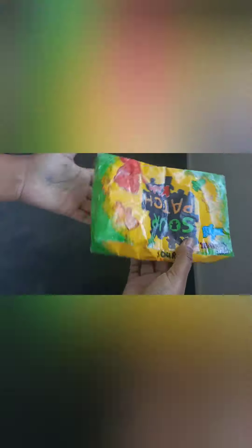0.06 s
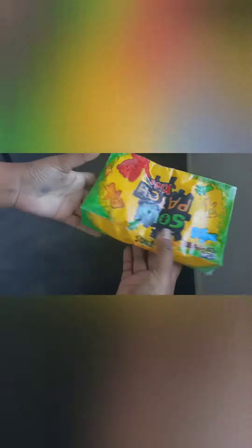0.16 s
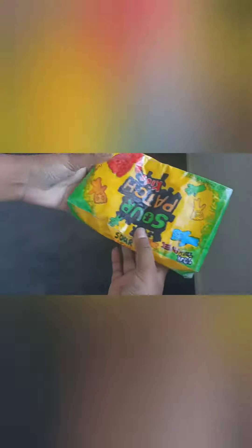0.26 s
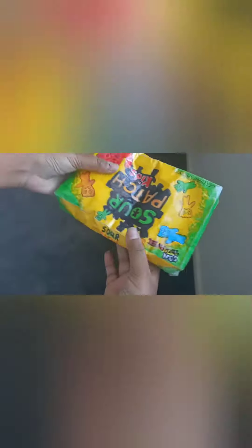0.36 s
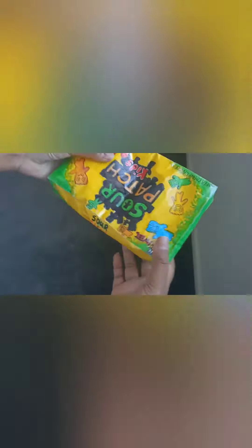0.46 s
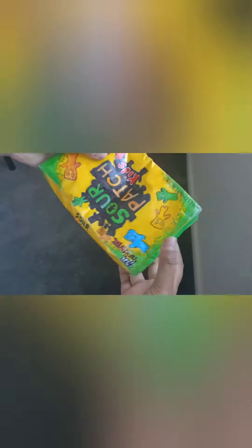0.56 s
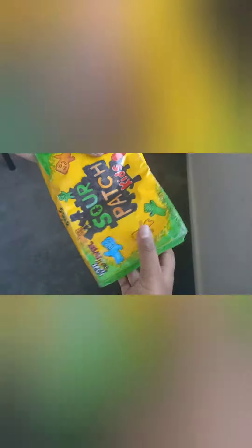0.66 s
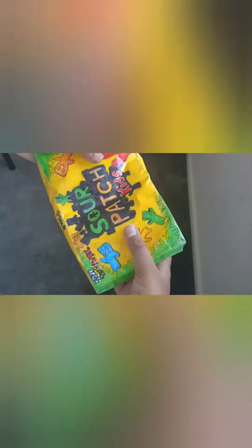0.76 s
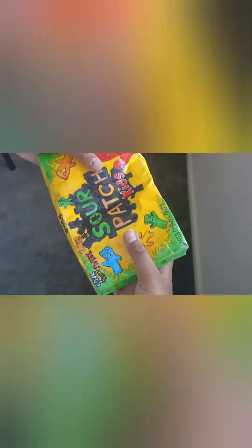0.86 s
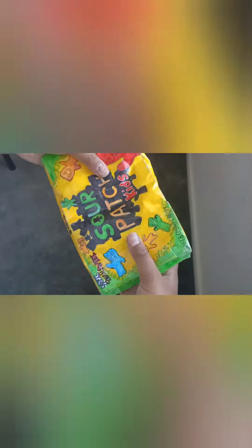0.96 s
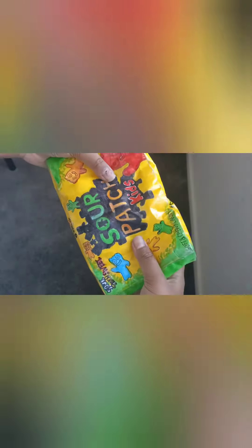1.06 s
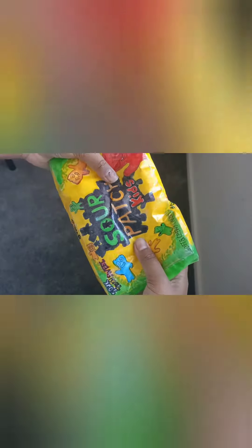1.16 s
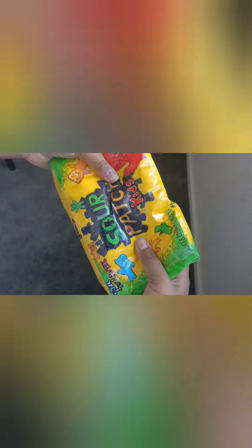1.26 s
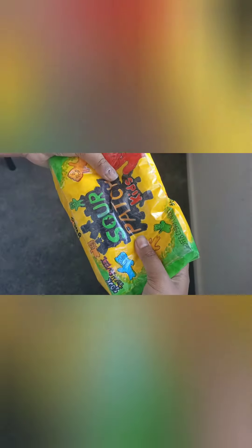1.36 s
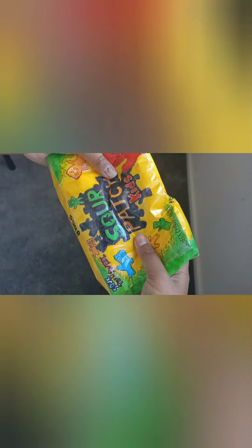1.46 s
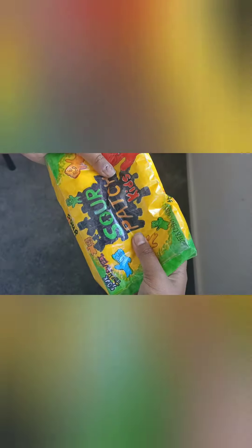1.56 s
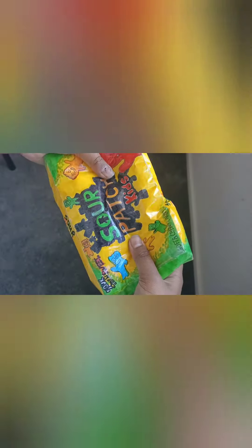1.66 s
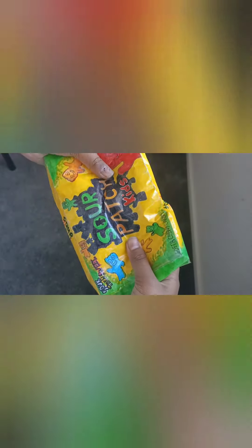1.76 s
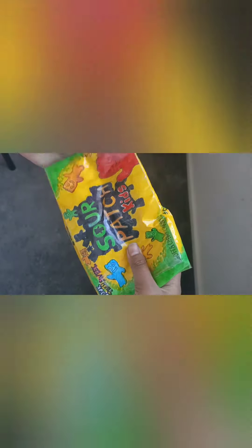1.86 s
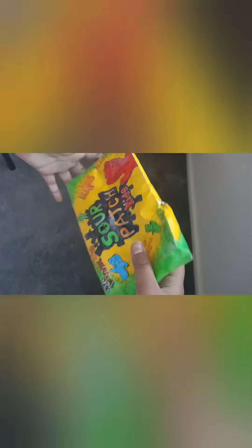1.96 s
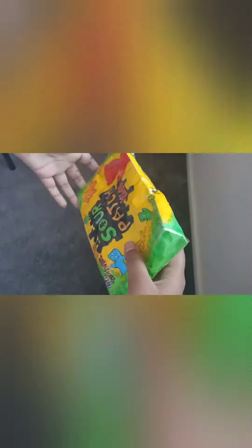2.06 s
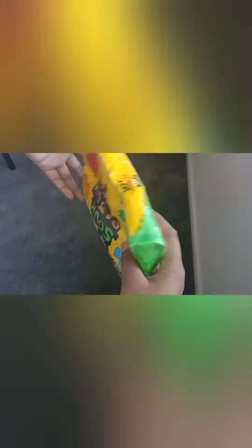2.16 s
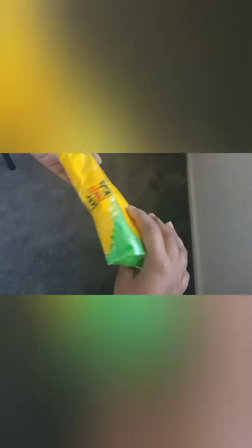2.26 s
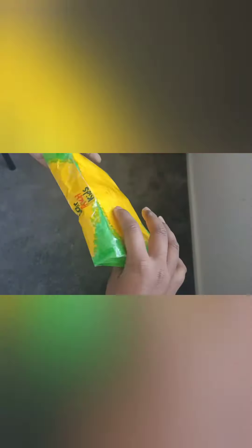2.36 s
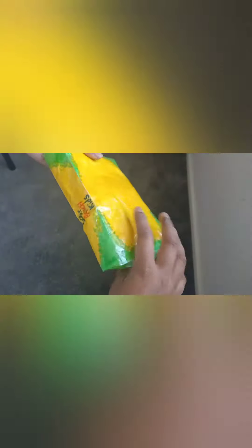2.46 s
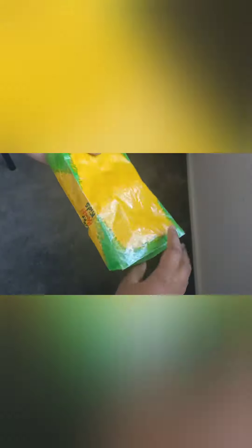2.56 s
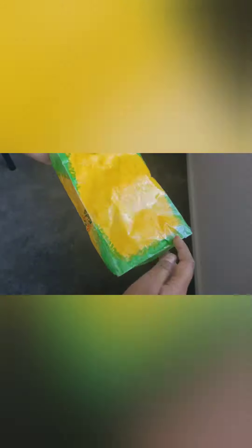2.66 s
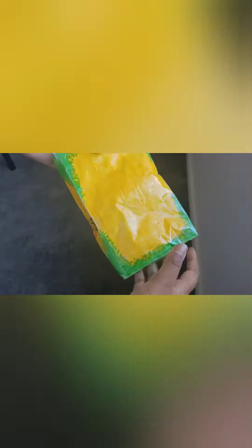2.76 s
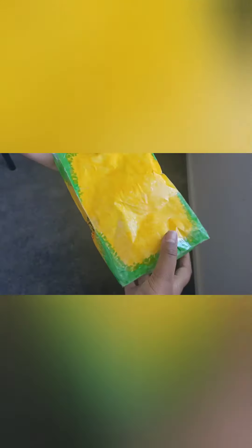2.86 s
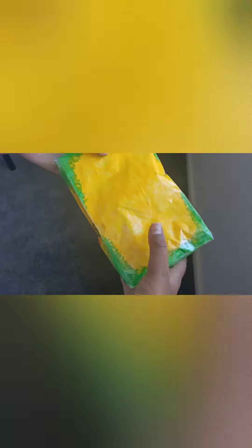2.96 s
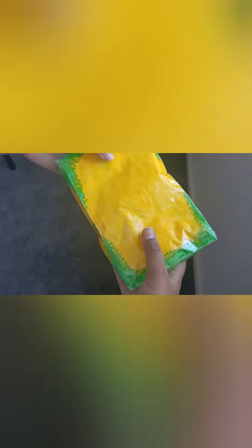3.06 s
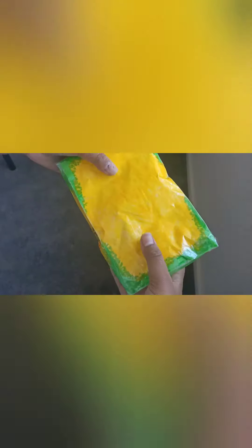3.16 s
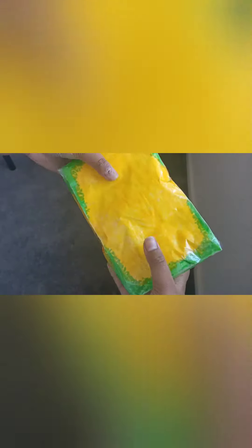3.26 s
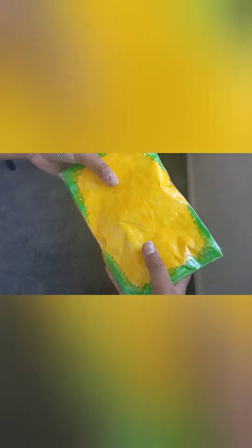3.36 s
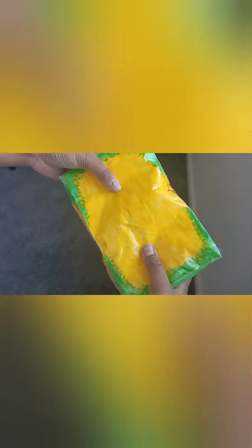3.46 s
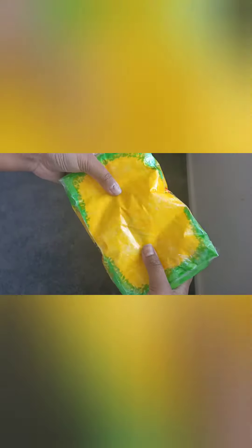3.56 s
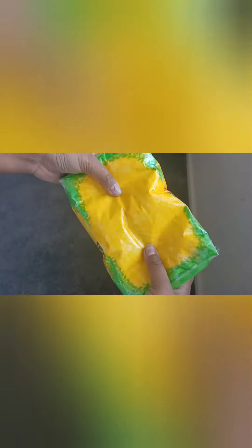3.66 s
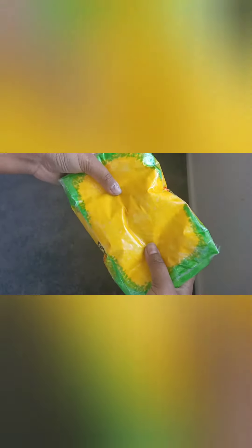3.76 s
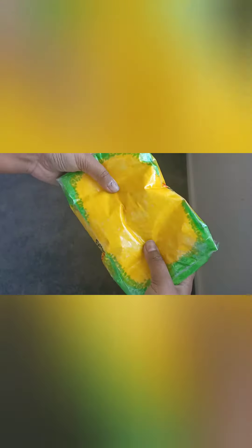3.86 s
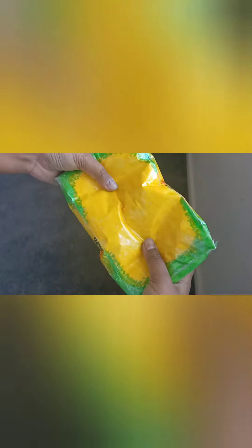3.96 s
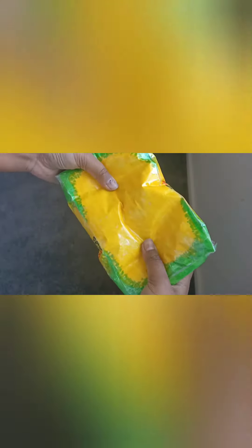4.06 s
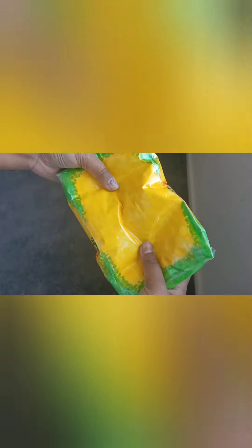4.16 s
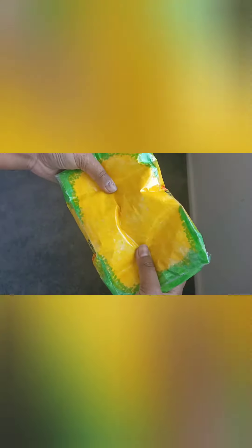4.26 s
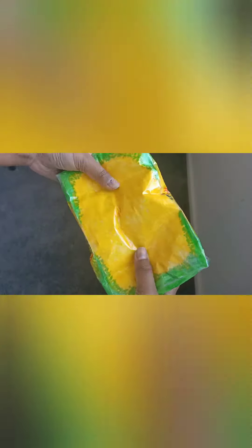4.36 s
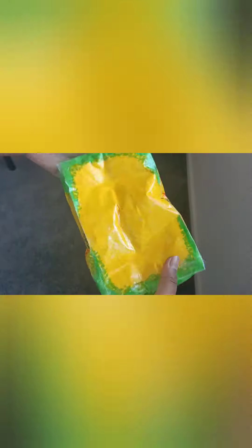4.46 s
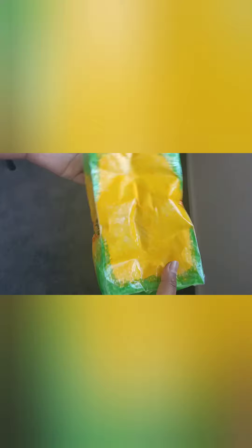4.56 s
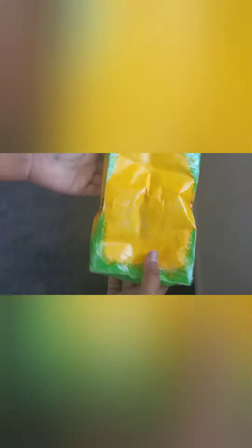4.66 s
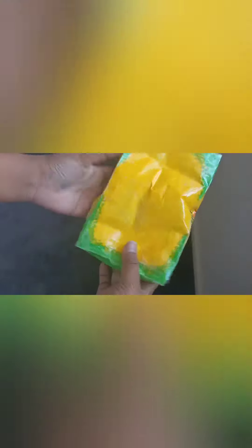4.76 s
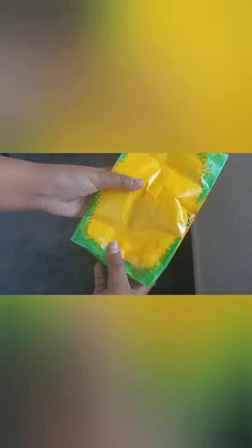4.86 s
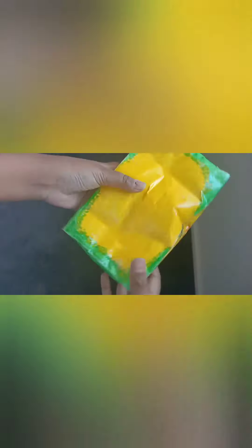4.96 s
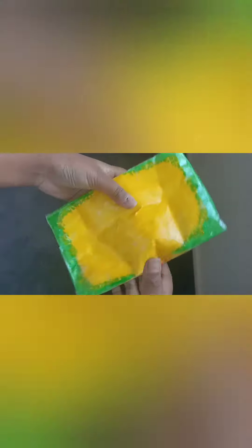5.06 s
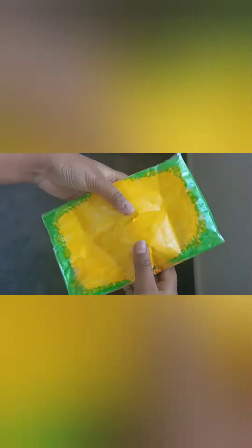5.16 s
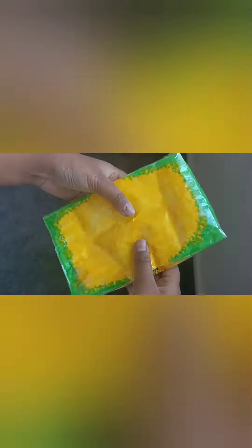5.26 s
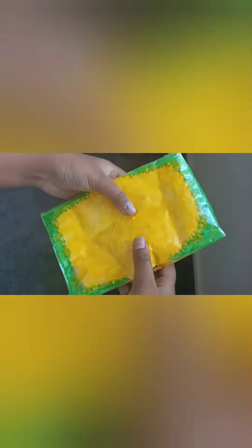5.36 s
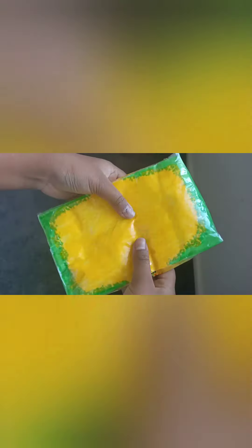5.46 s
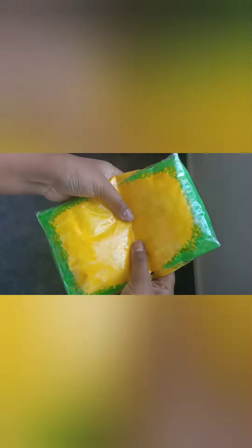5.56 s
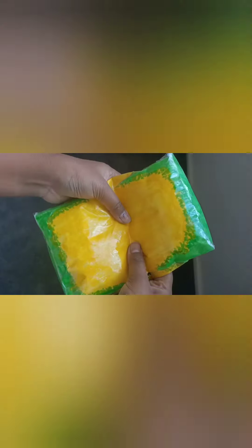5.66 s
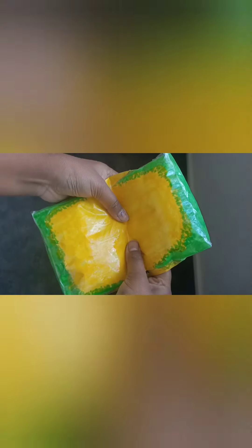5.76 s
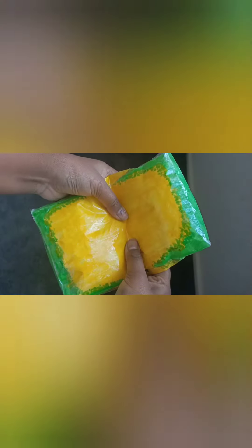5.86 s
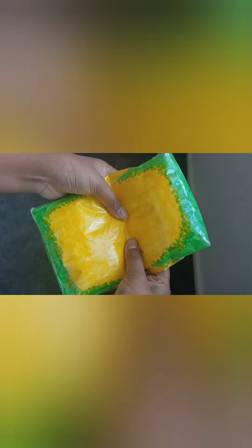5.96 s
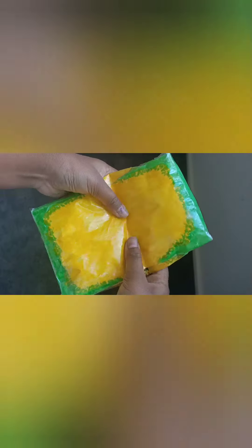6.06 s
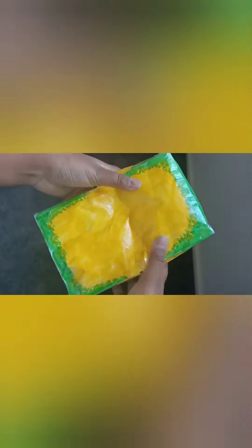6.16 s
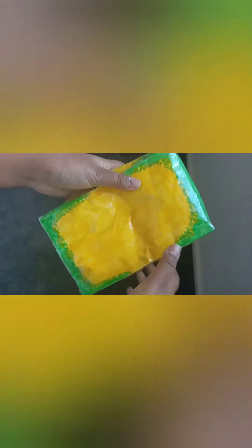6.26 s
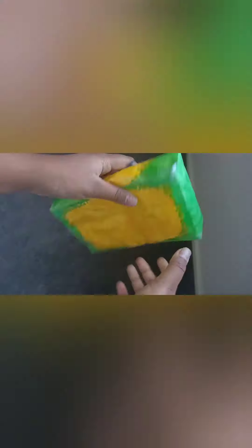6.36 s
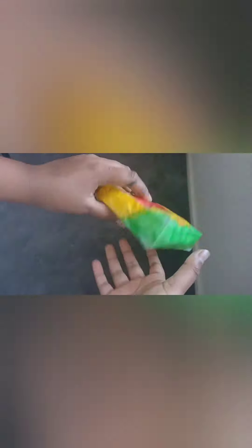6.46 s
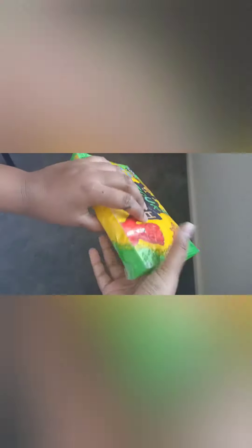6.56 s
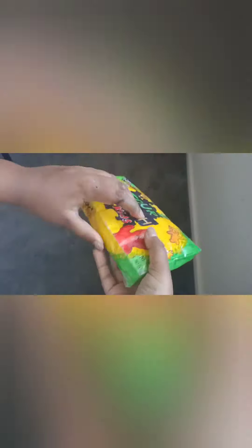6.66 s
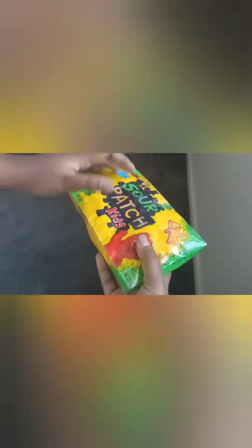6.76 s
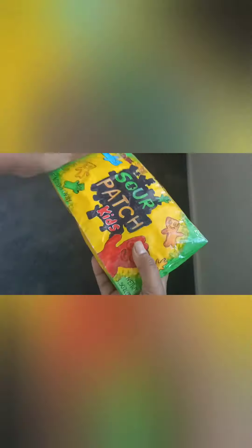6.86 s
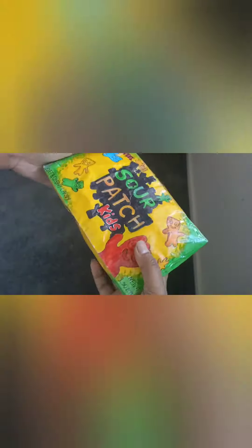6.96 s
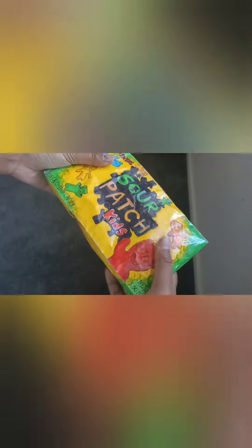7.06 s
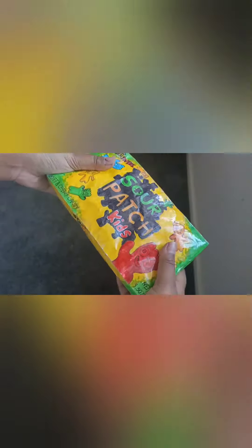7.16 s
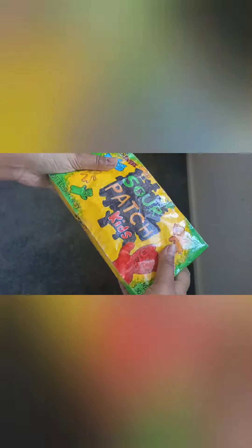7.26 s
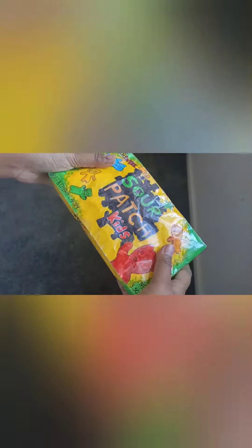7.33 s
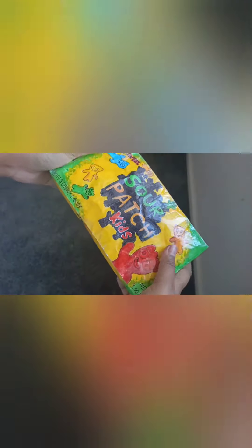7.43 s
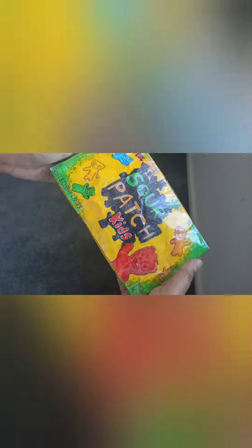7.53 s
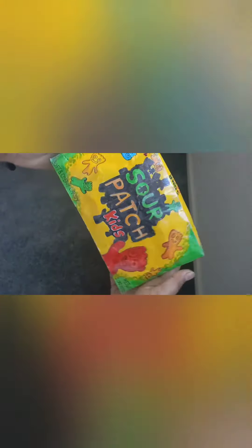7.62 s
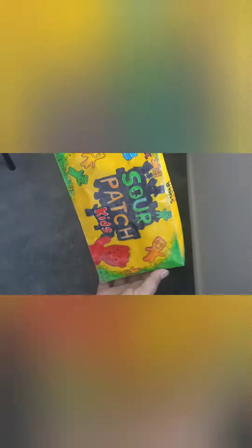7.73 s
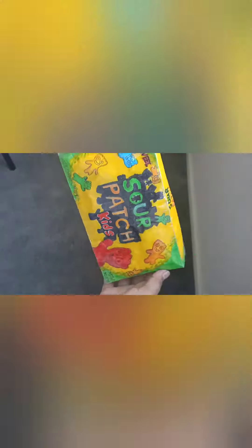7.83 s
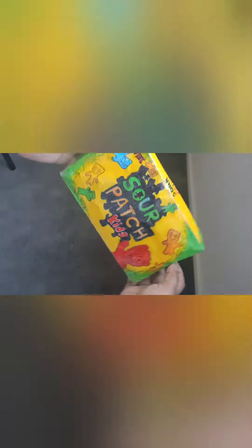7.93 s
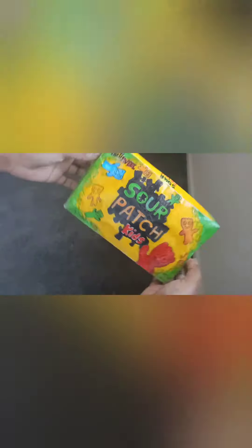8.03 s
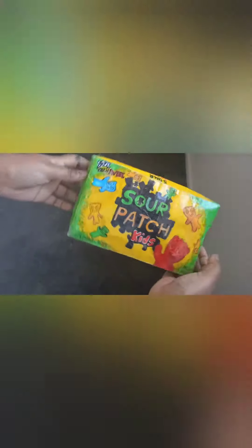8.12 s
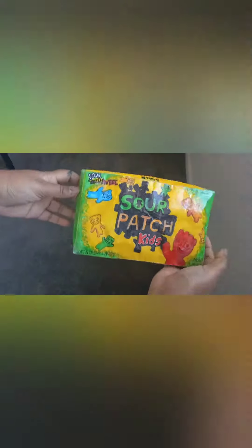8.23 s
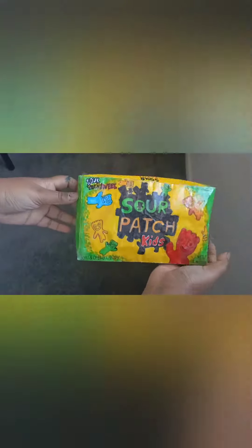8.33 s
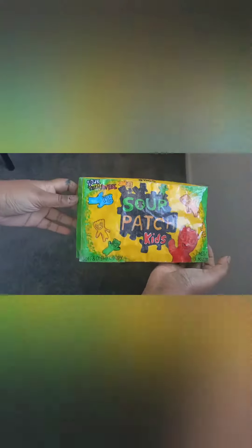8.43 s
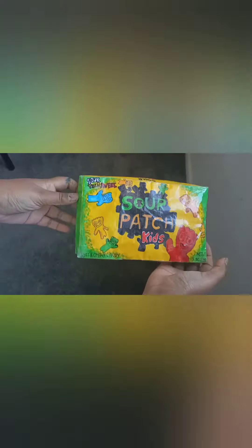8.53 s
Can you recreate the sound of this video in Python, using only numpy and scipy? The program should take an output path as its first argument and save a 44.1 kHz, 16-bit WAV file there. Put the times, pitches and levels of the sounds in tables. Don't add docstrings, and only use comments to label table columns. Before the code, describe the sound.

In a small quiet room with faint low rumble and barely audible hum, hands handle an air-filled crinkly pouch very close to a stereo phone microphone. From 0 to 0.8 seconds there are only light pats, scuffs and small crinkles. At about 1.0 a squeeze gives the loudest sharp crack, hollow thump and dense crackle, followed by smooth air hiss until 1.5. Brief snaps come near 1.85, then sparse clicks around 2.6 to 3.2. A second squeeze at 3.5 crunches less loudly, hissing until about 4.1; bright crinkles cluster at 4.3 to 4.5. From 5.25 to 5.7 a third squeeze brings rapid creases, deep thumps, a pop and a weaker, shorter hiss. A firm turn snaps at 6.15. Lighter clicks and pats follow, clustering near 7.2 and 7.5, thinning to a soft palm settling after 8.1 and a last small shift by 8.5.

```python
import sys
import numpy as np
from scipy import signal
from scipy.io import wavfile
from scipy.ndimage import uniform_filter1d

SR = 44100
rng = np.random.default_rng(int(sys.argv[2]) if len(sys.argv) > 2 else 0)


def wav_out(sig):
    wavfile.write(sys.argv[1], SR, np.round(np.clip(np.atleast_2d(sig).T, -1, 1) * 32767).astype(np.int16))


def boost_factor(decibels):
    exponent = np.asarray(decibels, float) / 20
    return 10 ** exponent


N = 378810


def evened(x):
    return x / np.sqrt(np.mean(x ** 2) + 1e-20)


def peaked(x):
    return x / abs(x).max()


def read(points, hz):
    f, value = np.transpose(points)
    return np.interp(np.log(hz + 1), np.log(f + 1), value)


def add(mix, s, sound):
    part = mix[:, round(s * SR):][:, :sound.shape[1]]
    part += sound[:, :part.shape[1]]


def causal(points):
    hz = abs(np.fft.fftfreq(4096, 1 / SR))
    log_gain = np.log(boost_factor(read(points, hz)))
    phase = -signal.hilbert(log_gain).imag
    return np.fft.ifft(np.exp(log_gain + 1j * phase)).real[:2048]


def ring(hz, cycles, size):
    turns = hz * np.arange(size) / SR
    swell_and_die = turns ** 2 * np.exp(-turns / cycles)
    fade = np.hanning(2 * size)[size:]
    return peaked(np.sin(2 * np.pi * turns) * swell_and_die * fade)


def ports(x, pan_db, lag):
    return np.array([x * boost_factor(pan_db / 2), np.roll(x, lag) * boost_factor(-pan_db / 2)])


def place(s):
    # time in seconds, lag of the right port in samples, left over right in dB.
    places = np.transpose([(.3, 7, 0), (1.05, 7, 4), (1.9, 4, 1.5), (3., 2, .5), (3.5, 1, 0),
                           (3.63, 5, -.5), (4.3, 1, .5), (5.3, 3, 1.5), (5.5, 1, 1.5), (5.65, 5, 2),
                           (7.2, 4, .5), (7.5, 1, -.5), (8.4, 7, 2.5)])
    lag = round(np.interp(s, places[0], places[1]))
    pan_db = np.interp(s, places[0], places[2])
    return lag, pan_db


def level(bursts, rise_db_per_s, rest_db):
    t = np.arange(0, N + 64, 64) / SR
    power = boost_factor(rest_db) ** 2
    for s, db, fall in bursts:
        slope_db = np.minimum(rise_db_per_s * (t - s), abs(fall) * (s - t))
        power = power + boost_factor(db + slope_db) ** 2
    return np.interp(np.arange(N) / SR, t, np.sqrt(power))


def noise(points, same, delay_s, patchy_db, size):
    frames, hz = N // (size // 4) + 5, np.fft.rfftfreq(size, 1 / SR)
    a, b, c, d, patches = rng.standard_normal((frames, len(hz), 5)).T
    patches = uniform_filter1d(patches, size=10, axis=0)
    patches = evened(uniform_filter1d(patches, size=10, axis=1))
    likeness = np.clip(read(same, hz), -1, 1)[:, None]
    left = a + 1j * b
    right = likeness * left + np.sqrt(1 - likeness ** 2) * (c + 1j * d)
    right = right * np.exp(-2j * np.pi * hz * delay_s)[:, None]
    z = np.array([left, right]) * boost_factor(read(points, hz)[:, None] + patchy_db * patches)
    z[:, hz > 15520] = 0
    return evened(signal.istft(z, nperseg=size, noverlap=3 * size // 4)[1][:, :N])


def creases():
    rows = list([(0.9748, -36.5, -18.5, 1520, -54.5), (1.0052, -34, -22, 2700, -25.5),
                 (1.0305, -16.5, -4, 1450, -36), (1.141, -33.5, -19.5, 1120, -55),
                 (1.8341, -32.5, -27.5, 1530, -30), (1.8772, -38, -26.5, 1380, -48),
                 (1.956, -41, -13.5, 3390, -33.5), (3.4631, -34, -21.5, 1290, -46.5),
                 (3.4772, -49, -28.5, 3300, -28.5), (3.54, -19, -14.5, 1370, -37.5),
                 (3.6284, -39, -14, 1055, -53), (4.3093, -38.5, -30, 1980, -53.5),
                 (4.4267, -46, -14, 1150, -27), (4.4318, -30.5, -16.5, 2800, -31),
                 (4.4913, -32.5, -32, 2380, -41), (5.2559, -34, -21, 1870, -36),
                 (5.287, -27.5, -18, 1300, -54), (5.4025, -42, -22.5, 960, -74),
                 (5.5174, -29.5, -12.5, 980, -53), (5.5668, -16, -28, 814, -49),
                 (5.6282, -35, -20.5, 1540, -51), (6.145, -39, -31, 2380, -40),
                 (6.1553, -25, -15, 2400, -33.5), (7.496, -35.5, -22, 1860, -46.5)])
    # time in seconds, hollow body in dB, ring in dB, sharp edge in dB.
    dents = [(0.795, -49.5, -57.5, -59), (0.9363, -42, -50.5, -65.5), (0.986, -28.5, -42.5, -59),
             (1.0889, -30.5, -26, -69), (1.2437, -33.5, -38.5, -50), (2.747, -44.5, -48.5, -65),
             (2.9331, -46.5, -48, -63), (2.9397, -44, -44.5, -74), (3.081, -50.5, -48, -64),
             (3.1977, -48, -78, -82), (3.311, -44.5, -49.5, -66), (3.3617, -44.5, -45, -73),
             (3.7126, -35.5, -35, -50), (4.2052, -41, -58.5, -57.5), (4.388, -35, -40, -54),
             (5.2037, -40, -36.5, -49.5), (5.429, -33.5, -35, -51.5), (5.4759, -39.5, -44, -68.5),
             (5.483, -37, -41, -69.5), (5.5, -24.5, -34, -78), (5.525, -25, -44, -54),
             (5.6041, -28, -31, -62), (6.0958, -33.5, -33, -60), (6.11, -34, -29.5, -63),
             (6.1276, -44, -40, -42), (7.152, -43, -31, -60), (7.284, -40, -35.5, -84),
             (7.2991, -36.5, -65, -73), (7.3174, -40, -61, -62), (8.409, -49.5, -46, -86.5)]
    # time in seconds, ring in dB, ring in Hz, sharp edge in dB.
    clicks = [(0.489, -35, 1560, -62), (1.0433, -29, 1870, -43.5), (1.7988, -26.5, 1780, -56.5),
              (2.625, -36.5, 1270, -49), (2.6677, -36, 1290, -59), (2.979, -38.5, 1780, -50),
              (3.4162, -29.5, 1210, -72), (3.4326, -22, 1830, -70), (3.456, -37, 1740, -63),
              (3.5514, -39, 1060, -53), (3.567, -30, 1320, -60), (4.45, -19, 1840, -52),
              (4.5199, -32.5, 1490, -53), (4.672, -31, 2460, -37), (4.803, -49, 1980, -59),
              (5.0249, -37, 2770, -38.5), (5.3, -48, 1010, -51), (5.5801, -27, 1470, -50),
              (5.8305, -27.5, 1930, -66), (6.089, -34, 2200, -67.5), (6.314, -45, 1500, -64.5),
              (6.6505, -36, 1350, -62), (6.7273, -38.5, 1420, -54), (7.0042, -42, 2920, -53),
              (7.115, -36, 930, -63), (7.1761, -31, 955, -64), (7.6635, -31.5, 2270, -55),
              (7.7762, -48, 1940, -63), (8.0539, -44.5, 2080, -68.5), (8.423, -37, 1360, -70)]
    # time in seconds, ring in dB, ring in Hz, sharp edge in dB.
    folds = [(0.369, -39.5, 1030, -56), (0.774, -38.5, 1950, -43.5), (1.1478, -38, 1450, -57),
             (2.1824, -38, 1270, -46.5), (2.4193, -42.5, 1580, -57), (2.459, -38, 1384, -52.5),
             (2.8874, -45, 1600, -58), (3.2207, -44, 2040, -54), (4.395, -27, 1640, -49),
             (4.905, -39, 1110, -54), (4.925, -69, 1970, -57), (4.9968, -46, 1390, -73),
             (5.2814, -29, 1640, -49), (5.416, -48, 1480, -60), (5.4911, -31, 1830, -69),
             (5.5347, -24, 1100, -39), (5.6787, -31.5, 1290, -67), (6.0701, -36.5, 1040, -60),
             (6.25, -44.5, 1156, -80), (6.5018, -43, 2310, -86), (6.599, -44.5, 1350, -65),
             (6.7107, -36.5, 2650, -60), (6.843, -43.5, 1500, -56), (6.9955, -46, 1660, -64),
             (7.0214, -36, 1180, -61), (7.111, -47, 1700, -63), (7.1633, -28, 1040, -56),
             (7.2072, -66, 1300, -58), (7.2196, -33, 1250, -70), (7.467, -44, 1100, -69)]
    # time in seconds, ring in dB.
    muffled = [
        (0.3602, -38),
        (0.3775, -37.5),
        (0.883, -43.5),
        (1.6254, -45),
    ]
    rows += [(s, body_db, ring_db, 1100, edge_db) for s, body_db, ring_db, edge_db in dents]
    rows += [(s, ring_db - 21, ring_db, hz, edge_db) for s, ring_db, hz, edge_db in clicks]
    rows += [(s, ring_db - 7.5, ring_db, hz, edge_db) for s, ring_db, hz, edge_db in folds]
    rows += [(s, ring_db - 19.5, ring_db, 1100, ring_db - 26.5) for s, ring_db in muffled]
    return sorted(rows)


def snaps(rows):
    edge = causal([(2000, -7.5), (4500, -2.5), (8000, 1), (15000, -22.5)])
    # pitch in Hz, width in Hz, level in dB.
    body = [(267, 161, -4), (421, 126.5, 0), (654, 137, -4)]
    out, t = np.zeros((2, N)), np.arange(2048) / SR
    fade = np.hanning(4096)[2048:]
    lead = 130
    away = abs(np.arange(300) - lead) / SR
    for s, body_db, ring_db, hz, edge_db in rows:
        u = rng.random(600)

        tune, weight_db = 1 + .25 * (u[6:9] - .5), 7 * (u[9:12] - .5)
        hollow = np.zeros(2048)
        for (f, width, db), k, w in zip(body, tune, weight_db):
            hollow += boost_factor(db + w) * np.sin(2 * np.pi * f * k * t) * np.exp(-np.pi * width * t)
        soft_start = (1 - np.exp(-t / .0007)) ** 2
        push = np.pad(peaked(hollow * soft_start), (lead - 70, 0))[:2048]

        slips = np.zeros(400)
        at = [0, 12 + int(30 * u[0]), 60 + int(200 * u[1])]
        slips[at] = 1, .6 * (2 * u[2] - 1), .25 * (2 * u[3] - 1)
        tone = ring(hz, cycles=0.31, size=600) + 0.57 * ring(2.2 * hz, cycles=0.3, size=600)
        swing = np.convolve(slips, tone)

        crowding = np.exp(-away / .00025) + .25 * np.exp(-away / .0015)
        splinters = (2 * u[300:] - 1) ** 3 * crowding
        sharp = peaked(np.convolve(splinters, edge)[:2048])

        x = boost_factor(body_db - 0.5) * push + boost_factor(edge_db + 11.5) * sharp
        x[lead - 25:][:len(swing)] += boost_factor(ring_db - 2.5) * peaked(swing)

        lag, pan_db = place(s)
        shift = 5 + int(8 * u[5])
        far_face = 0.089 * (np.roll(x, shift) - np.roll(x, -shift)) * [[-1], [1]]
        sign = np.sign(u[4] - .5)
        add(out, s - lead / SR, sign * fade * (ports(x, pan_db, lag) + far_face))
    return out


def pops():
    # time in seconds, crack in dB, crack length in seconds, rebound in dB.
    events = [
        (1.005, -1, .00005, -10),
        (5.5136, -17, .0001, -30),
        (6.1513, -16, .00008, -25),
    ]
    out, t = np.zeros((2, N)), np.arange(-64, 1024) / SR
    after = np.maximum(t, 0)
    for s, crack_db, length, rebound_db in events:
        crack = np.exp(-abs(t) / length) * np.where(t < 0, 1, 1 - after / length)
        dying = boost_factor(-60 * after / .013)
        rebound = -np.cos(2 * np.pi * 270 * after) * (1 - np.exp(-after / length / 2)) * dying
        lag, pan_db = place(s)
        add(out, s + t[0], ports(boost_factor(crack_db) * crack + boost_factor(rebound_db) * rebound, pan_db, lag))
    return out


def pats():
    # time in seconds, peak in dB, pitch in Hz.
    taps = [(0.216, -45, 92), (0.986, -31.5, 142), (1.88, -38.5, 131.5), (1.957, -48.5, 117.7),
            (2.036, -44.5, 102), (2.629, -37.5, 98), (2.985, -41.5, 70), (3.391, -49, 115),
            (3.468, -35.5, 167), (4.313, -39.5, 163), (4.49, -40, 169), (4.917, -43.5, 105),
            (5.211, -42.5, 90.4), (5.515, -27, 103), (6.154, -33, 94), (6.846, -49.5, 65),
            (7.109, -46.5, 88), (7.169, -40, 111.6), (7.323, -38, 116), (8.105, -45.5, 169)]
    # time in seconds, peak in dB, pitch in Hz.
    rub = [
        (8.086, -56.5, 192.4),
        (8.118, -55, 198),
        (8.134, -52.5, 158),
        (8.516, -54.5, 380),
    ]
    out = np.zeros((2, N))
    for s, db, hz in taps + rub:
        swing = boost_factor(db - 2.0) * ring(hz, cycles=0.29, size=5000)
        add(out, s - 0.98 / hz, ports(swing, 1.5, lag=5))
    return out


def crackle():
    # pitch in Hz, level in dB per Hz.
    colour = [(150, -7.5), (450, -4), (1200, -9), (4000, -18.5), (9000, -32.5)]
    # time in seconds, level in dB, fall in dB per second.
    working = [(.78, -57, 139), (.98, -35, 202), (1.04, -35.5, 134.5), (1.15, -50.5, 55), (1.83, -41, 96),
               (2.43, -61, 112), (2.63, -46, 285.5), (2.94, -57.5, 297.5), (3.1, -51.5, 574),
               (3.35, -54.5, 56.5), (3.48, -35, 83), (4.32, -53, 67), (4.41, -36, 111), (4.92, -46, 366),
               (5.29, -39.5, 250), (5.42, -47, 169), (5.52, -30, 488.5), (5.6, -37.5, 162),
               (5.85, -54.5, 360.5), (6.1, -37, 203.5), (6.16, -32.5, 356), (6.62, -50, 81),
               (6.83, -50.5, 294), (7.01, -52.5, 77), (7.17, -46.5, 102), (7.3, -50.5, 67)]
    clumps = boost_factor(3. * evened(uniform_filter1d(rng.standard_normal(N), size=900)))
    out = np.zeros((2, N))
    for lag, hz in zip((6, 2, 8, 4, 0, 10, 3, 7), np.geomspace(200, 9000, 8)):
        struck = rng.random(N) < 240 / SR
        clicks = boost_factor(2.8 * np.minimum(rng.exponential(1, N), 4)) * struck
        clicks = clicks * clumps * rng.choice([-1, 1], N)
        grain = ring(hz, cycles=0.25, size=900) * boost_factor(read(colour, hz)) * hz
        crisp_start = ring(2.7 * min(hz, 3000), cycles=.3, size=80)
        grain[:80] += .5 * abs(grain).max() * crisp_start
        out += ports(signal.oaconvolve(clicks, grain)[:N], 1.8, lag)
    return boost_factor(-7.5) * evened(out) * level(working, rise_db_per_s=496, rest_db=-75.5)


def scuffs():
    # time in seconds,
    # hollow body in dB, ring in dB, sharp edge in dB.
    crinkles = [(0.2074, -63, -53, -73), (0.238, -61, -52.5, -62), (0.2688, -61, -58, -58),
                (0.3268, -64, -51.5, -57), (0.4661, -75, -46.5, -38.5), (0.5403, -64, -60, -76),
                (0.5966, -58.5, -56, -59), (0.733, -57, -53, -78), (0.7585, -49.5, -65, -64),
                (0.9826, -43.5, -32, -57), (1.1134, -48, -35, -48), (1.1398, -20, -33, -51),
                (1.1485, -34.5, -33, -50), (1.187, -40, -53.5, -48), (1.2666, -54, -46, -51),
                (1.2888, -54, -68, -51), (1.4571, -72, -59, -64.5), (1.9566, -69, -48, -60),
                (2.0311, -55, -49, -64), (2.2739, -76, -52, -58.5), (2.6337, -44.5, -44, -49),
                (2.6485, -72, -72, -67), (2.7307, -78, -76, -62), (2.8075, -59.5, -55, -81),
                (2.8198, -58, -71, -79), (2.8982, -58, -50, -60), (3.1092, -54.5, -56, -56),
                (3.1821, -57.5, -65, -77), (3.3941, -43, -81.5, -70), (3.4195, -40, -36, -64.5),
                (3.4334, -32, -33.5, -63), (3.4835, -37.5, -48.5, -56.5), (3.4897, -44, -47, -57),
                (3.5728, -42, -48.5, -54), (3.5857, -39, -48, -54), (3.6087, -49, -50, -58),
                (3.6528, -48, -65, -56), (3.6887, -46, -56, -55), (3.7179, -54, -65, -35),
                (3.7345, -57, -40, -47), (3.7555, -62, -64, -40), (4.4774, -58, -38, -41),
                (4.488, -55, -32.5, -38), (4.609, -72, -56, -67), (4.7363, -62, -56, -75),
                (4.8033, -77.5, -58, -53), (4.8383, -63, -53, -55), (4.8883, -63, -52, -68),
                (4.9437, -48.5, -71, -77), (5.1075, -59, -50.5, -77), (5.1554, -68.5, -71.5, -71.5),
             (5.1656, -70.5, -73, -80), (5.299, -37, -39, -64), (5.416, -57, -38.5, -68),
             (5.4607, -47, -51, -64), (5.471, -42, -46, -71), (5.5058, -33.5, -39, -65),
             (5.5285, -34, -39, -60), (5.5362, -41, -34, -42), (5.5515, -34, -49, -61.5),
             (5.567, -26, -38, -60), (5.604, -40, -55, -61), (5.6217, -36, -61, -63),
             (5.6458, -40, -43, -50), (5.717, -64, -55, -66), (5.8304, -42.5, -62, -60),
             (6.0795, -43.5, -48.5, -61), (6.1218, -27, -39, -60), (6.1335, -52, -51, -47.5),
             (6.4182, -72, -50.5, -77), (6.453, -64, -51.5, -77.5), (6.5753, -57, -57, -68),
             (6.5883, -73, -61, -77), (6.6144, -69, -48, -64), (6.699, -56, -49, -65),
             (6.7926, -60, -50, -78), (6.8128, -57, -48, -67), (6.829, -55, -46, -58),
             (6.9538, -55, -54, -71), (7.054, -55, -46, -62), (7.1046, -55, -49, -71),
             (7.129, -48, -43, -50.5), (7.2074, -64, -66, -51), (7.222, -43, -51, -70),
             (7.2457, -54, -65, -71), (7.303, -51, -65, -70), (7.3178, -36, -63, -54),
             (7.3738, -57, -70, -58), (7.447, -56, -52, -71), (7.4769, -56, -46, -53),
             (7.517, -49, -54, -70), (7.529, -72, -58, -72), (7.6965, -66, -75, -80),
             (7.721, -59.5, -57.5, -62), (7.9512, -59, -72, -85), (8.0914, -53, -61.5, -75)]
    rows, out, lead = crinkles, np.zeros((2, N)), 150
    t = (np.arange(900) - lead) / SR
    burst = np.exp(-np.where(t < 0, -t / 0.00058, t / 0.00061))
    grit = rng.standard_normal((len(rows), 900)) * burst
    mid = signal.sosfilt(signal.butter(2, [900., 3500.], "band", fs=SR, output="sos"), grit)
    top = signal.sosfilt(signal.butter(4, 5000., "high", fs=SR, output="sos"), grit)
    for (s, body_db, ring_db, edge_db), a, b in zip(rows, mid, top):
        body_hz = 420. * boost_factor(2 * np.tanh(b[lead]))
        x = boost_factor(body_db - 1.5) * ring(body_hz, cycles=0.42, size=900)
        x = x + boost_factor(ring_db) * peaked(a) + boost_factor(edge_db + 6.0) * peaked(b)
        add(out, s - lead / SR, ports(x, 1.0, lag=4))
    return out


def ticks():
    # time in seconds, peak in dB.
    lifts = [
        (6.5733, -57),
        (7.72, -59),
        (7.811, -51.5),
        (7.9863, -55),
        (8.285, -63.5),
    ]
    return snaps([(s, 2 * db, db - 4, 2200, db - 5.0) for s, db in lifts])


def leak():
    # time in seconds, hiss in dB.
    squeezes = [
        [(.99, -85), (1.03, -51.5), (1.15, -45.5), (1.3, -47), (1.42, -53.5), (1.47, -63.5), (1.53, -76)],
        [(3.45, -66), (3.5, -59), (3.62, -46.5), (3.77, -46), (3.96, -51.5), (4.05, -59.5), (4.15, -71.5)],
        [(5.35, -73), (5.55, -62), (5.65, -54), (5.76, -63), (5.9, -70)],
    ]
    t = np.arange(N) / SR
    return sum(boost_factor(np.interp(t, *np.transpose(squeeze), left=-120, right=-120)) for squeeze in squeezes)


def hiss():
    # pitch in Hz, level in dB per Hz.
    colour = [(500, -7.5), (1400, -2.5), (3000, 3), (5000, 3.5), (7500, 2), (14000, -5.5)]
    # pitch in Hz, level in dB.
    seam = [(3500, -3), (5000, -5.5), (8000, 0.5), (14000, 3)]
    # time in seconds, hiss in dB, fall in dB per second.
    slides = [(.468, -45.5, 494), (1.85, -47.5, 102), (2.63, -57.5, 457.5), (4.42, -41, 137),
              (4.68, -60.5, 132), (5.28, -62.5, 62), (6.14, -41, 390), (6.65, -62.5, 63), (6.76, -61, 500),
              (6.84, -66, 400), (7.16, -63.5, 42), (7.39, -60.5, 81), (8.11, -63.5, 82)]
    leaking = leak()
    gain = np.hypot(level(slides, rise_db_per_s=484, rest_db=-79), leaking)
    jerks = uniform_filter1d(rng.standard_normal(N), size=600)
    jerks = evened(uniform_filter1d(jerks, size=600))
    jerky_db = 4 / (1 + (gain / boost_factor(-58)) ** 2)
    air = noise(colour, [(1000, 0.22)], 0.00027, patchy_db=2.1, size=512)
    jet = signal.oaconvolve(air, causal(seam)[None], axes=1)[:, :N]
    share = (leaking / gain) ** 2
    return boost_factor(-3.5 + jerky_db * jerks) * (air + share * (jet - air)) * gain


def room(x):
    # pitch in Hz, seconds to fall by 60 dB.
    decay = [(150, 0.19), (500, 0.22), (1500, 0.18), (3000, 0.16), (8000, 0.035), (15000, 0.11)]
    taps = np.zeros((2, SR // 2))
    at = np.arange(120, SR // 2 - 20, 20)
    at = at + rng.integers(0, 20, (2, len(at)))
    np.put_along_axis(taps, at, rng.choice([-1., 1.], at.shape), 1)
    hz, t, z = signal.stft(taps, SR, nperseg=256)
    z[1] += (z[0] - z[1]) / (1 + (hz[:, None] / 130.0) ** 4)
    dying = boost_factor(-60 * t / np.maximum(read(decay, hz), .02)[:, None])
    tail = signal.istft(z * dying, SR, nperseg=256)[1]
    return signal.fftconvolve(x, tail / np.linalg.norm(tail[0]), axes=1)[:, :N]


def background():
    # pitch in Hz, level in dB per Hz.
    rumble = [(25, 25), (60, 8.5), (115, 9), (200, -7), (450, -6), (1400, -8.5), (3500, -12),
              (15000, -23.5)]
    # pitch in Hz, likeness from 0 to 1.
    alike = [(60, 1), (130, 0.79), (300, 0.087), (1000, 0.)]
    # start in seconds, end in seconds, pitch in Hz, level in dB, drift in Hz per second.
    hums = [
        (0., 0.86, 196, -77, -3),
        (4.113, 4.302, 672, -72, -5.),
        (6.6, 6.96, 665, -71, 120.),
        (7.7, 8.1, 703, -81, -5.),
    ]
    out = boost_factor(-63) * noise(rumble, alike, 0, patchy_db=1.8, size=1024)
    for start, end, hz, db, drift in hums:
        t = np.arange(round((end - start) * SR)) / SR
        hum = np.sin(2 * np.pi * (hz + drift * t / 2) * t) * np.hanning(len(t)) ** .5
        add(out, start, boost_factor(db) * hum * np.ones((2, 1)))
    return out


def scene():
    pouch = snaps(creases()) + pops() + pats() + crackle() + scuffs()
    return pouch + ticks() + hiss() + boost_factor(-13.5) * room(pouch) + background()


def roll_off(x):
    return signal.sosfilt(signal.butter(12, 16820, fs=SR, output="sos"), x)


def record(dry):
    # pitch in Hz, level in dB.
    left_port = [(3000, 2), (4100, 0.5), (4900, -6.5), (6500, -3.5), (8300, 7), (9800, 3), (11500, -2.5),
                 (14000, 0.5)]
    # pitch in Hz, level in dB.
    right_port = [(3000, 1.5), (4100, 1.5), (4900, -3.5), (6900, 5), (9000, 0.5), (11500, 0), (13800, 8),
                  (15000, 5)]
    mix = signal.oaconvolve(dry, np.array([causal(left_port), causal(right_port)]), axes=1)[:, :N]
    mix = signal.sosfilt(signal.butter(2, 100., "high", fs=SR, output="sos"), mix)
    mix = np.tanh(mix)
    treble_cut = signal.firwin(191, 16300, window=("kaiser", 8), fs=SR)
    mix = signal.oaconvolve(mix, treble_cut[None], "same")
    return roll_off(mix)


dry = scene()
out = record(dry)
wav_out(out)
```